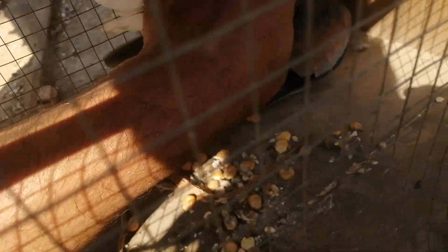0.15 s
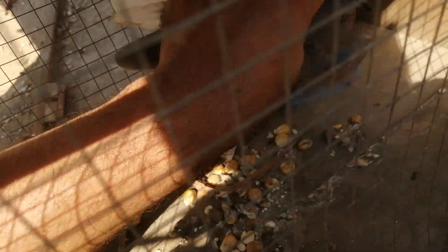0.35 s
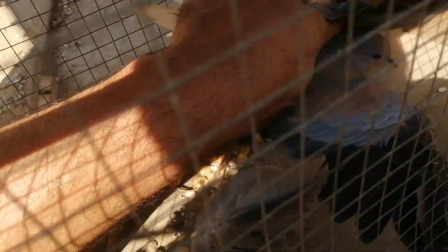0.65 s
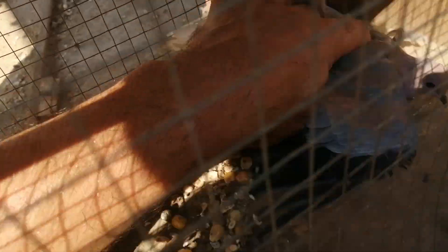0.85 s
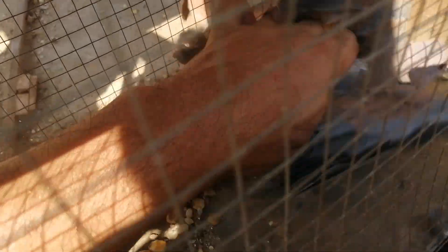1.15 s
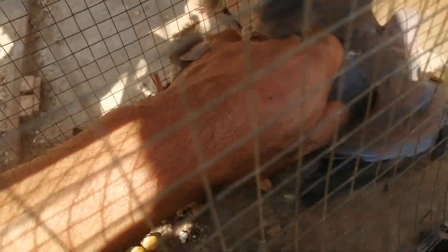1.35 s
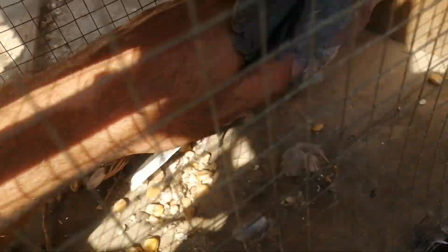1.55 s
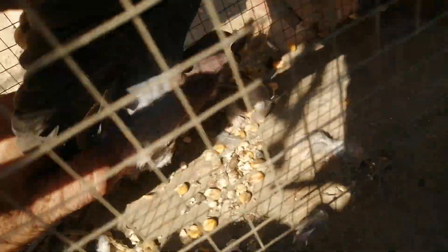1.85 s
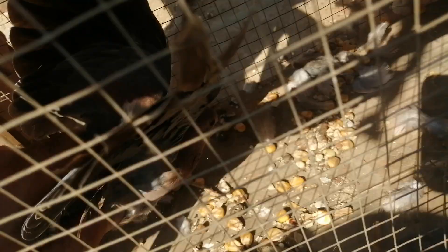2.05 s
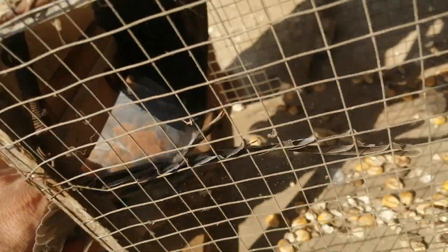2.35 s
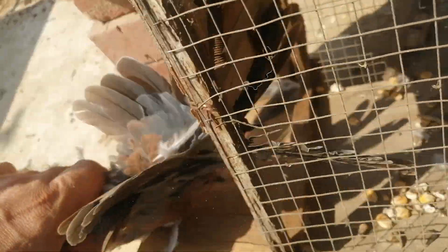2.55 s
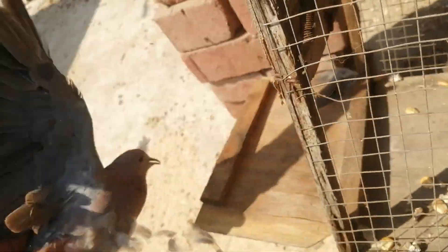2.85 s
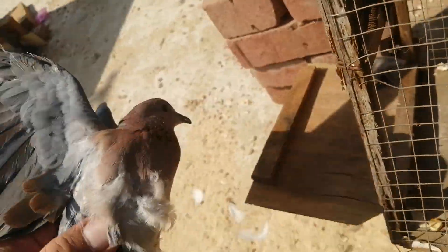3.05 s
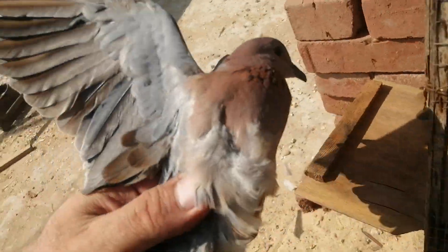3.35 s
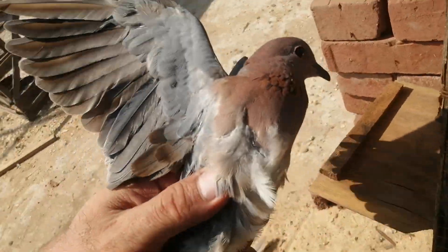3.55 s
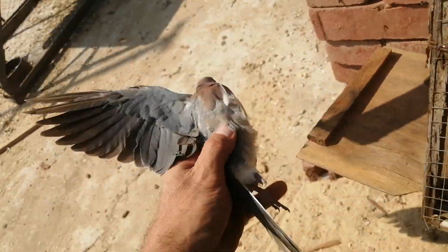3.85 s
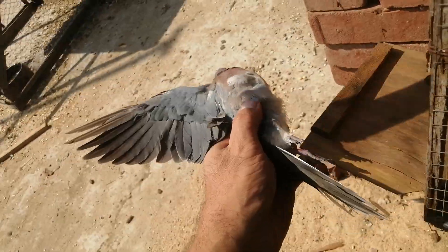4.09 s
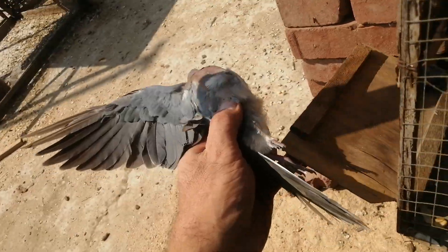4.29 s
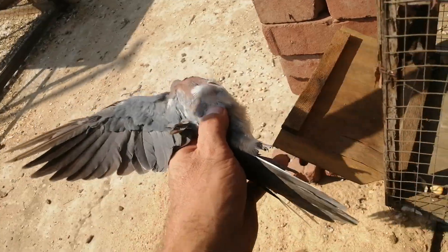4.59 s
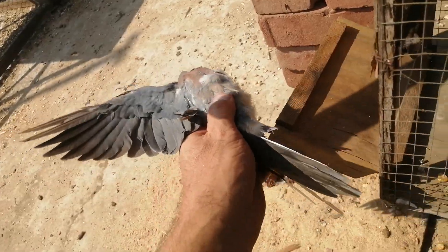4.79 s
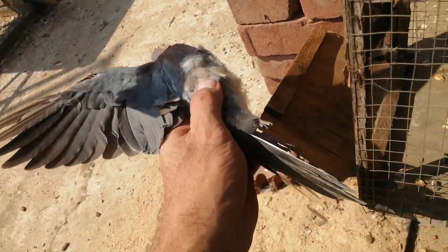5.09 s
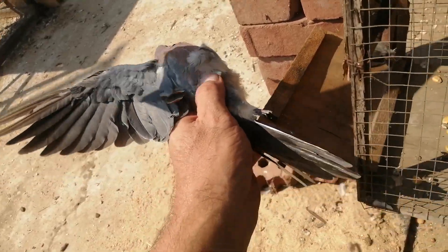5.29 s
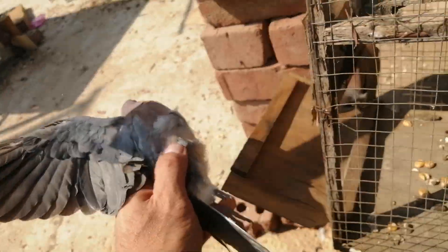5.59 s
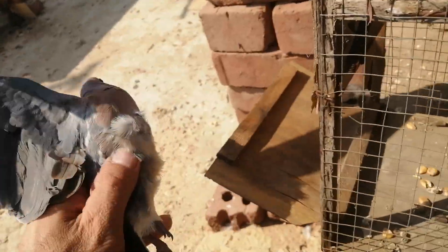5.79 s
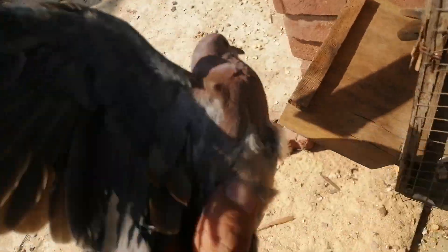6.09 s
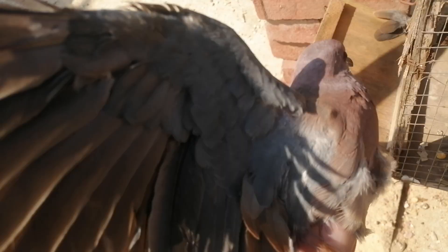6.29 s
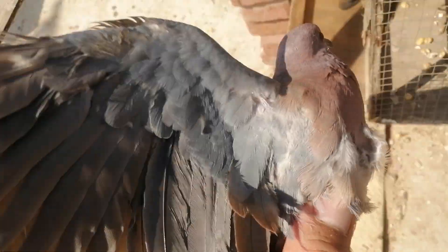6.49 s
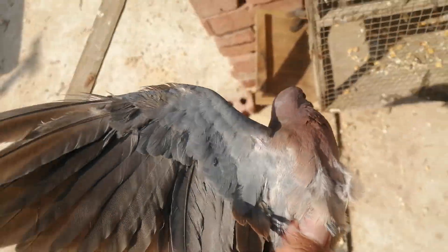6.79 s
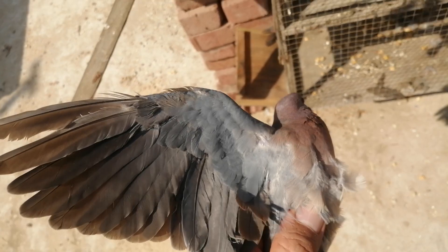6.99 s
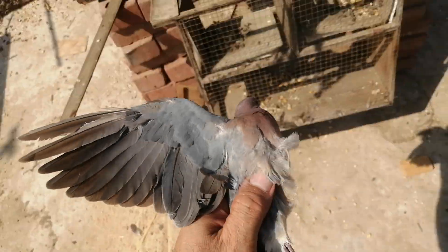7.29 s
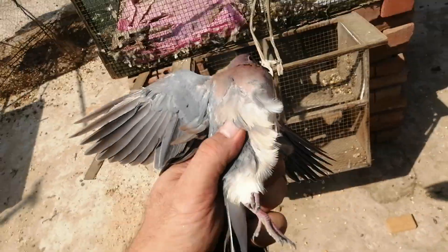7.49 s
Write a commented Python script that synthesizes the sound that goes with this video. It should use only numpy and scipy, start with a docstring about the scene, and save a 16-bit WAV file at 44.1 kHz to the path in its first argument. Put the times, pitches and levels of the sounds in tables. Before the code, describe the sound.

Close stereo sound in a quiet outdoor yard. From 0 to 0.35 seconds there is soft rustling and a light wing swish. Between about 0.36 and 1.35 a dove beats irregularly against its cage: sharp quill cracks, wooden knocks, hollow panel bumps and very short wire rings, strongest near 0.6, 0.8, 0.9 and 1.3, with bright feather hiss. From 1.4 to 1.9 it subsides into rustling and dry flicks. Around 1.9 to 2.5 the door frame hums faintly under a dragging arm. Afterwards come sparse soft feather strokes and tiny ticks. At 4.4 to 4.8 a shoe scuffs gritty concrete, ending in a sharp snap. A folding wing hisses thinly around 5.6 to 6.1, then rustling and clearer ticks increase from 6.6 to the end. Faint chirps and a distant wavering bird call appear sporadically.

```python
"""A dove caught by hand in a wire cage beats its wings on mesh and wooden frame, then is lifted out and spread.
Impacts are decaying noise bursts; frame, panels and wires ring as damped sines.
Feathers hiss by friction: grainy noise shaped by the speed of each stroke, with resonant snags and ticks.
A shoe scuffs on gritty concrete: friction noise and impacts. Other birds call faintly as gliding or wavering
sines, over the coloured noise of quiet outdoor air."""
import sys
import numpy as np
from scipy import signal
from scipy.fft import rfft, irfft
from scipy.io import wavfile

SR = 44100
rng = np.random.default_rng(int(sys.argv[2]) if len(sys.argv) > 2 else 0)


def inscribe(sig):
    """Save sig as 16-bit PCM at rate SR to the path in sys.argv[1].

    A 1-D sig is mono; a 2-D sig holds one channel per row.
    Samples are clipped to [-1, 1] before scaling.
    """
    pcm = np.round(np.clip(np.atleast_2d(sig).T, -1, 1) * 32767)
    wavfile.write(sys.argv[1], SR, pcm.astype(np.int16))


N = 336924
TIME = np.arange(N) / SR   # t/s

# Levels in the event tables are relative: the sources add their own offsets.
# wing blows on the cage: [t/s, quill crack level/dB, frame knock level/dB]
WING_BLOWS = [(0.3635, -23.5, -16), (0.451, -10, -23), (0.466, -22, -19.5), (0.609, -10, -9.5),
              (0.619, -11.5, -16), (0.633, -12.5, -14.5), (0.6494, -18, -7), (0.7856, -8.5, 0.5),
              (0.872, -11.5, -18.5), (0.8908, -7, -6), (0.9360, -12.5, -11.5), (0.9946, -18, -22),
              (1.0111, -8.5, -15.5), (1.065, -26, -17), (1.136, -14, -25), (1.166, -21, -26),
              (1.1888, -30, -23), (1.306, -10.5, -5), (1.328, -13, -15.5)]
# wingbeats sweeping along the mesh: [start t/s, length/s, vane hiss level/dB]
WINGBEATS = [(0.131, 0.068, -36), (0.353, 0.071, -44), (0.437, 0.13, -26), (0.607, 0.095, -16.5),
             (0.756, 0.065, -23.5), (0.785, 0.066, -13.5), (0.855, 0.03, -27), (0.931, 0.041, -14.5),
             (1.048, 0.059, -15), (1.163, 0.05, -17.5), (1.276, 0.12, -19)]
# dull bumps on the panels, each ringing at a pitch set by the spot: [t/s, thud level/dB, f/Hz]
BUMPS = [(0.4667, -25, 258), (0.609, -13.5, 273), (0.6489, -24, 348), (0.7869, -15, 345), (0.938, -26, 292),
         (1.064, -27.5, 311), (1.308, -29, 346), (1.439, -36, 284), (1.918, -38, 325), (2.514, -42.5, 273),
         (3.236, -43, 270)]
# clear flicks of quills and claws past wire and fingers: [t/s, crack level/dB]
TICKS = [(0.18, -26.5), (1.441, -25.5), (1.468, -25.5), (1.545, -25), (1.572, -19), (1.796, -24),
         (1.916, -23.5), (2.107, -32.5), (2.25, -31.5), (2.348, -30), (2.399, -33.5), (2.572, -27.5),
         (2.604, -28.5), (2.904, -31), (3.142, -39), (3.404, -27.5), (3.782, -28.5), (3.935, -33),
         (4.092, -34), (4.224, -36), (4.281, -28.5), (4.798, -29), (4.852, -27), (5.031, -33), (5.069, -33),
         (5.258, -35), (5.527, -32.5), (5.787, -36.5), (5.812, -39), (6.311, -31.5), (6.348, -29.5),
         (6.471, -34), (6.587, -21), (6.669, -25.5), (6.756, -28), (6.787, -29), (6.905, -28.5),
         (7.151, -31), (7.23, -32.5), (7.259, -27), (7.589, -26)]
# clear finger strokes through the plumage: [start t/s, level/dB]
STROKES = [(2.087, -42.5), (2.348, -40), (2.514, -37.5), (2.686, -36.5), (2.9, -33.5), (2.979, -37.5),
           (3.405, -38), (3.682, -41), (3.781, -37.5), (3.884, -42), (3.955, -43), (4.053, -36.5),
           (4.158, -35.5), (4.269, -34.5), (4.908, -34), (4.94, -37), (5.647, -48.5), (5.887, -42.5),
           (5.974, -42), (6.219, -42), (6.354, -33), (6.554, -35.5), (6.784, -36.5), (6.934, -36),
           (7.16, -37.5), (7.335, -40), (7.593, -34.5)]
# how busily the bird is handled, as the level of its rustle: [t/s, level/dB]
HANDLING = [(0, -37.5), (.25, -44), (.36, -31), (.9, -27.5), (1.25, -30), (1.66, -34.5), (1.9, -37.5),
            (2.03, -50.5), (2.3, -45), (2.84, -48), (4.95, -48), (5.55, -59), (5.75, -54.5), (6.2, -53.5),
            (6.72, -40.5), (7.64, -42)]
# place of the bird as it is lifted out: [t/s, left minus right level/dB, lag of the left port/s]
BIRD_SIDE = [(1.8, 2.4, .00014), (2.1, 4, -.00022)]
# shoe meeting the ground: [t/s, grit crack level/dB, knock level/dB, thud level/dB]
FOOTFALLS = [(4.3802, -18.5, -49, -38), (4.4852, -28, -18.5, -21), (4.76, -9, -12.5, -42)]
# sole dragging over grit: [t/s, level/dB]
SCUFF = [(4.38, -26.5), (4.465, -32), (4.53, -20.5), (4.58, -27), (4.68, -31), (4.75, -43), (4.78, -26.5),
         (4.82, -37)]
# one long far-off call: [t/s, f/Hz, level/dB]
FAR_CALL = [(5.8, 650, -69), (5.97, 800, -61), (6.02, 760, -69), (6.075, 750, -59), (6.12, 760, -66)]
# soft bird notes: [start t/s, length/s, f/Hz, level/dB]
BIRD_NOTES = [(3.79, 0.24, 2550, -56), (6.234, 0.084, 467, -44)]
# distant chirps: [start t/s]
CHIRP_STARTS = [2.215, 2.761, 3.024, 3.65, 5.395, 5.485, 6.18]
# resonances of the cage: [f/Hz, level/dB, time to decay by 60 dB/s]
CAGE_MODES = [(71.9, -14.5, 0.64), (690, -3.5, 0.032), (1389, -7.5, 0.051)]

# Relative spectral densities, interpolated over log f.
# hiss of feather vanes: [f/Hz, level/dB]
VANE = [(900, -28), (3200, -17), (4500, -7), (6100, -2), (7200, -6), (9000, -7), (11500, -15), (15500, -15)]
# thin hiss of the wing tips: [f/Hz, level/dB]
WING_TIP = [(3000, -21), (8000, -1), (11000, -3.5), (15500, -0.5)]
# dull rub of the body: [f/Hz, level/dB]
RUB = [(40, -3), (120, -1.5), (320, 4.5), (520, -4), (800, -4.5), (1400, -2), (2100, -1), (3200, -9),
       (6000, -18)]
# sharp crack of a hard contact: [f/Hz, level/dB]
CRACK = [(700, -39), (3200, -7), (4600, 0), (6100, 7), (8000, -1.5), (11500, -7), (15500, -8.5)]
# knock of a hard contact: [f/Hz, level/dB]
KNOCK = [(130, -13.5), (360, 0.5), (520, -5.5), (740, -1.5), (950, 0.5), (1380, 2), (2100, -1.5),
         (3200, -7.5), (6000, -41)]
# thud of a heavy contact: [f/Hz, level/dB]
THUD = [(25, -6.5), (70, 1), (125, -3.5), (240, 3), (400, -10.5), (800, -35)]
# grit under the sole: [f/Hz, level/dB]
GRIT = [(100, -9.5), (300, -2.5), (700, -1.5), (1100, -5), (1800, 4.5), (3300, -7), (5800, -4), (9000, -14),
        (15500, -23.5)]
# outdoor air: [f/Hz, level/dB]
YARD = [(25, 0), (90, 5.5), (160, -15), (270, 6), (900, -37), (1900, -4), (3700, -14), (15500, -11.5)]
# correlation of the two microphone ports: [f/Hz, left-right likeness, 0 to 1]
LIKENESS = [(60, .8), (300, .92), (700, .86), (1400, .3), (3000, 0)]
# level difference of the two ports: [f/Hz, left minus right level/dB]
SHADOW = [(300, -4), (700, -5.5), (1300, -7.5), (4400, -6.5), (6200, -9.5), (8100, 6.5), (11000, 1.5),
          (14000, -5.5)]

CUTOFF_HZ = 16100
THUD_BELOW_KNOCK_DB = 18   # a wing is light: it shakes the panels far less than it knocks
PANEL_RING_DB, PANEL_T60_S = 6.5, 0.093   # level relative to the tabulated thud
WING_RUB_DB = -26.5   # the wing rubs on the hand alike in every beat
HANDLING_UNEVEN_DB = 1.5   # rms
HOLD_HISS_MAX_DB = -33   # pressed feathers: cap on the hiss of holding, before its flutter
STROKE_FLICK_DB, STROKE_S = -7, 0.048   # flick of a vane at the start, relative to its stroke; length
FOLD_START_S, FOLD_END_S, FOLD_DB = 5.62, 6.12, -45   # the spread wing slides shut
FAINT_TICKS_PER_S, FAINT_TICK_DB = 17, 0   # level relative to the handling
FAINT_TICK_SPREAD_DB = 8   # either way
# an arm drags along the door frame, which hums hollowly
DRAG_START_S, DRAG_END_S, DRAG_DB, DRAG_HZ, DRAG_T60_S = 1.9, 2.54, -46, 325, 0.053
CHIRP_DB, CHIRP_S = -54, 0.055
CHIRP_HZ, CHIRP_FALL_HZ_PER_S = 2880, 3500   # mid-chirp pitch and its fall, before the rasp


def from_db(db):
    """Amplitude ratio of a level: twenty decibels per factor of ten."""
    return 10 ** (np.asarray(db) / 20)


def rms_one(x):
    """Normalization to unit mean power."""
    return x / np.sqrt(np.mean(x ** 2) + 1e-20)


def in_time(rows):
    """Linear interpolation of each column against the time in the first."""
    s, *columns = np.transpose(rows)
    return [np.interp(TIME, s, c) for c in columns]


def at_hz(points, hz):
    """Interpolation of a spectrum along logarithmic frequency."""
    point_hz, values = np.array(points).T
    return np.interp(np.log(hz + 1), np.log(point_hz), values)


def drift(rate):
    """Slow random modulation: linear paths between Gaussian knots, rate of them a second; rms 1."""
    knots = rng.standard_normal(int(N / SR * rate) + 2)
    return rms_one(np.interp(TIME * rate, np.arange(len(knots)), knots))


def pan(x, left_db, lag_s):
    """Stereo localization: the ports differ in level and in arrival time."""
    late = np.clip(np.round((TIME - lag_s) * SR).astype(int), 0, N - 1)
    return np.array([x[0, late] * from_db(left_db / 2), x[1] * from_db(-left_db / 2)])


def minimum_phase(y, magnitude):
    """Causal filtering: folding the cepstrum gives the minimum-phase response of a magnitude."""
    cepstrum = irfft(np.log(magnitude))
    half = cepstrum.shape[1] // 2
    cepstrum[:, 1:half] *= 2
    cepstrum[:, half + 1:] = 0
    response = irfft(np.exp(rfft(cepstrum)))
    return signal.oaconvolve(y, response, axes=1)[:, :N]


def colour(x, spectrum, size=4096):
    """Spectral shaping at unit power gain; mid and side noise give the ports their partial correlation."""
    hz = np.arange(size // 2 + 1) * SR / size
    gain = rms_one(from_db(at_hz(spectrum, hz)))
    alike = np.clip(at_hz(LIKENESS, hz), -.98, .98)
    shadow = from_db(at_hz(SHADOW, hz) * np.array([[.5], [-.5]]))
    shadow = shadow / np.sqrt(np.mean(shadow ** 2, axis=0))
    mid, side = minimum_phase(x, np.sqrt([(1 + alike) / 2, (1 - alike) / 2]))
    return minimum_phase(np.array([mid + side, mid - side]), gain * shadow)


def friction(slips_per_s=220, size_db=2.5, slip_s=0.0042, smooth=0.2):
    """Stick-slip friction: many uneven slips, each a brief burst, over a smooth share of hiss; rms 1."""
    sizes = from_db(size_db * np.minimum(rng.exponential(1, N), 4))
    slips = (rng.random(N) < slips_per_s / SR) * sizes ** 2
    power = signal.lfilter([1], [1, -np.exp(-1 / (slip_s * SR))], slips + 1e-18)
    share = np.clip(smooth, 0, 1)
    return rng.standard_normal((2, N)) * np.sqrt(share + (1 - share) * power / power.mean())


def impacts(times, levels_db, rise_s, t60, tail_db, tail_t60):
    """Impact noise: a fast-dying burst, then weaker scatter from the surfaces around."""
    age = np.arange(SR // 2) / SR
    decay = from_db(-60 * age / t60) ** 2
    scatter = from_db(tail_db - 60 * age / tail_t60) ** 2
    shape = (1 - np.exp(-age / rise_s)) ** 2 * (decay + scatter)
    power = np.zeros(N + len(age))
    for s, level_db in zip(times, levels_db):
        at = max(int(s * SR), 0)
        power[at:at + len(age)] += from_db(level_db) ** 2 * shape
    return rng.standard_normal((2, N)) * np.sqrt(power[:N])


def strikes(rows, ring_db, scatter_db, crack_t60, knock_t60):
    """Hard contact: a brief high crack and a lower knock, each with a scattered tail."""
    s, crack_db, knock_db = np.transpose(rows)[:3]
    crack = impacts(s, crack_db + 7.0, rise_s=0.00054, t60=crack_t60, tail_db=scatter_db, tail_t60=0.17)
    knock = impacts(s, knock_db + 5, rise_s=.0006, t60=knock_t60, tail_db=ring_db, tail_t60=.22)
    return colour(crack, CRACK) + colour(knock, KNOCK)


def thuds(rows, t60):
    """Heavy contact: a low burst with a short rumble after it; rows of [t/s, level/dB]."""
    s, thud_db = np.transpose(rows)
    burst = impacts(s, thud_db + 3.5, rise_s=0.00095, t60=t60, tail_db=-32, tail_t60=0.35)
    return colour(burst, THUD)


def ring(clicks, hz, t60):
    """Damped resonance: a unit click starts a decaying sine of initial height 1."""
    radius, angle = from_db(-60 / (t60 * SR)), 2 * np.pi * hz / SR
    feedback = [1, -2 * radius * np.cos(angle), radius * radius]
    return signal.lfilter([0, np.sin(angle)], feedback, clicks + 1e-18)


def stroke_speed(start, end, swell_s, fade):
    """Kinematics of a stroke: speed swells quickly, then eases off over the last share of its length."""
    span = slice(int(start * SR), int(end * SR))
    t = TIME[span]
    ramp = np.minimum((t - start) / swell_s, (end - t) / (fade * (end - start)))
    return span, np.sin(np.pi / 2 * np.clip(ramp, 0, 1))


def bounce(x, delay_s=.0017, wander=0.2976, echo_db=-8.5):
    """Early reflection: arm, floor and cage wall return one close echo whose delay wanders about delay_s."""
    echo = np.array([np.interp(TIME - delay_s * np.exp(wander * drift(5)), TIME, side) for side in x])
    gain = from_db(echo_db)
    return (x + gain * echo) / np.sqrt(1 + gain ** 2)


def yard(level_db=-54):
    """Ambient noise: steady random pressure coloured as quiet outdoor air."""
    return from_db(level_db) * colour(rng.standard_normal((2, N)), YARD)


def birds(note_waver=0.0222):
    """Frequency modulation: soft wavering notes, rasping downward chirps and one distant call."""
    out = np.zeros(N)
    wavering_time = np.cumsum(1 + note_waver * drift(200)) / SR
    flutter = from_db(3.5 * drift(70))
    for s, length, hz, level_db in BIRD_NOTES:
        swell = np.sin(np.pi * np.clip((TIME - s) / length, 0, 1))
        out += from_db(level_db) * swell * np.sin(2 * np.pi * hz * wavering_time)

    # fast drift roughens each chirp, slow drift shifts its pitch
    rasp = 1 + .04 * drift(700) + .06 * drift(10)
    age = TIME[:int(CHIRP_S * SR)]
    swell = np.sin(np.pi * age / CHIRP_S)
    for s in CHIRP_STARTS:
        span = slice(int(s * SR), int(s * SR) + len(age))
        glide_hz = (CHIRP_HZ - CHIRP_FALL_HZ_PER_S * (age - CHIRP_S / 2)) * rasp[span]
        out[span] += from_db(CHIRP_DB) * swell * np.sin(2 * np.pi * np.cumsum(glide_hz) / SR)

    pitch_hz, level_db = in_time(FAR_CALL)
    calling = (TIME > FAR_CALL[0][0]) & (TIME < FAR_CALL[-1][0])
    phase = 2 * np.pi * np.cumsum(pitch_hz * (1 + note_waver * drift(120))) / SR
    return flutter * (out + calling * from_db(level_db) * np.sin(phase))


def shoe():
    """Friction and impact: the sole touches down, drags over grit and snaps near the end, off to the right."""
    level_db, = in_time(SCUFF)
    touching = (TIME > SCUFF[0][0]) & (TIME < SCUFF[-1][0])
    drag = colour(friction() * touching * from_db(level_db), GRIT)
    steps = strikes(FOOTFALLS, ring_db=-20.5, scatter_db=-19.5, crack_t60=0.021, knock_t60=0.02)
    steps = steps + thuds([(s, thud_db) for s, _, _, thud_db in FOOTFALLS], t60=0.17)
    solid_ground = signal.butter(1, 105, "high", fs=SR, output="sos")   # concrete gives little deep bass
    steps = signal.sosfilt(solid_ground, steps)
    return pan(drag, left_db=-1.5, lag_s=0.00028) + pan(steps, left_db=-1.0, lag_s=0.00036)


def door_drag():
    """Friction-driven resonance: uneven slips keep the frame humming, fading as the arm comes out."""
    hum = rms_one(ring(friction()[0], DRAG_HZ, DRAG_T60_S))
    span, speed = stroke_speed(DRAG_START_S, DRAG_END_S, swell_s=DRAG_T60_S, fade=1)
    out = np.zeros(N)
    out[span] = from_db(DRAG_DB) * speed * hum[span]
    return out


def panel_rings():
    """Plate resonance: a bumped panel gives a short hollow note."""
    out, age = np.zeros(N), TIME[:SR // 4]
    for s, thud_db, hz in BUMPS:
        at = int(s * SR)
        decay = from_db(thud_db + PANEL_RING_DB - 60 * age / PANEL_T60_S)
        out[at:at + len(age)] += decay * np.sin(2 * np.pi * hz * age)
    return out


def wires(count=14, low_hz=650, high_hz=10000, level_db=-34.5, t60=0.032):
    """Plucked spans: each blow sets some of the mesh ringing briefly, each span at its own pitch."""
    out, age = np.zeros((2, N)), TIME[:SR // 4]
    for s, crack_db, knock_db in WING_BLOWS:
        place = rng.random((count, 1))   # short spans ring high and answer the crack, long ones the knock
        hz = low_hz * (high_hz / low_hz) ** place
        heights = from_db(level_db + knock_db + place * (crack_db - knock_db))
        rings = heights * from_db(-60 * age / t60) * np.sin(2 * np.pi * hz * age)
        at = int(s * SR)
        out[:, at:at + len(age)] += rng.standard_normal((2, count)) @ rings
    return out


def panel_shoves():
    """Momentum transfer: bumps shake the panels, wing blows lightly; rows of [t/s, level/dB]."""
    bumps = [(s, thud_db) for s, thud_db, _ in BUMPS]
    return bumps + [(s, knock_db - THUD_BELOW_KNOCK_DB) for s, _, knock_db in WING_BLOWS]


def cage():
    """Modal excitation: shoves boom the lowest mode, knocks ring the upper ones; strikes and thuds sound too."""
    shoves = panel_shoves()
    knocks = [(s, knock_db) for s, _, knock_db in WING_BLOWS]
    modes = np.zeros(N)
    for k, (hz, level_db, t60) in enumerate(CAGE_MODES):
        s, force_db = np.transpose(shoves if hz < 500 else knocks)
        clicks = np.bincount((s * SR).astype(int), from_db(force_db + level_db), N)
        modes += (-1) ** k * ring(clicks, hz, t60)   # neighbouring modes have opposite sign
    contact = strikes(WING_BLOWS, ring_db=-15.5, scatter_db=-22, crack_t60=0.034, knock_t60=0.033)
    return modes + contact + thuds(shoves, t60=0.085)


def ticks(stroke_knock_db=-12, hard_flick_db=-24, softening=0.68):
    """Light impact: quills and claws flick drily, lighter flicks knock less; faint ones come by chance."""
    count = int(FAINT_TICKS_PER_S * N / SR)
    s = rng.random(count) * TIME[-1]
    spread_db = FAINT_TICK_SPREAD_DB * rng.uniform(-1, 1, count)
    faint_db = np.interp(s, *np.transpose(HANDLING)) + FAINT_TICK_DB + spread_db
    flicks = list(TICKS) + list(zip(s, faint_db))
    quills = [(at, db, db + softening * min(db - hard_flick_db, 0)) for at, db in flicks]
    vanes = [(at, db + STROKE_FLICK_DB, db + stroke_knock_db) for at, db in STROKES]
    return bounce(strikes(quills + vanes, ring_db=-33, scatter_db=-24, crack_t60=0.014, knock_t60=0.022))


def snags(per_s=260, count=40, low_hz=1200, high_hz=10000, cycles=18):
    """Catch and release: single barbs and shafts tick, each at one of count pitches; rms 1."""
    sizes = rng.standard_normal(N) * (rng.random(N) < per_s / SR)
    dealt = rng.integers(0, count, N)
    out = np.zeros((2, N))
    for k, hz in enumerate(np.geomspace(low_hz, high_hz, count)):
        angle = 2 * np.pi * rng.random()   # each pitch reaches the two ports in its own proportion
        tick = hz * ring(sizes * (dealt == k), hz, cycles / hz)
        out += np.outer([np.cos(angle), np.sin(angle)], tick)
    return rms_one(out)


def feathers(handling_rub_db=-1.0, stroke_rub_db=-4.0, snag_db=-10.0, wing_tip_db=-2.0):
    """Sliding friction: barbs hiss and snag, the body rubs duller, sliding vanes add a brighter hiss."""
    # powers of each kind of contact over time
    handling_db = in_time(HANDLING)[0] + HANDLING_UNEVEN_DB * drift(20)
    holding = from_db(np.minimum(handling_db, HOLD_HISS_MAX_DB) + 3.53 * drift(110)) ** 2
    rub = from_db(handling_db + handling_rub_db + 1.57 * drift(55)) ** 2
    sliding, folding = np.zeros((2, N))
    for start, length, vane_db in WINGBEATS:
        span, speed = stroke_speed(start, start + length, swell_s=0.0088, fade=0.66)
        sliding[span] += (speed * from_db(vane_db)) ** 2
        rub[span] += (speed * from_db(WING_RUB_DB)) ** 2
    for start, level_db in STROKES:
        span, speed = stroke_speed(start, start + STROKE_S, swell_s=0.0053, fade=0.8)
        sliding[span] += (speed * from_db(level_db)) ** 2
        rub[span] += (speed * from_db(level_db + stroke_rub_db)) ** 2
    span, speed = stroke_speed(FOLD_START_S, FOLD_END_S, swell_s=0.08, fade=0.3)
    folding[span] = (speed * from_db(FOLD_DB)) ** 2

    barbs, tips = (friction(slips_per_s=450, size_db=3.2, slip_s=.0008, smooth=.42) for _ in range(2))
    hiss = np.sqrt(holding + sliding)
    pull = np.minimum(hiss, from_db(-25.0))   # a single barb holds only so much before it lets go
    vanes = colour(barbs * hiss, VANE) + from_db(snag_db) * pull * snags()
    edges = from_db(wing_tip_db) * colour(tips * np.sqrt(sliding + folding), WING_TIP)
    body = colour(friction() * np.sqrt(rub), RUB)
    return bounce(vanes + edges + body)


def scene():
    """Superposition: the yard and its birds, the shoe, and the dove with its cage."""
    dove = door_drag() + panel_rings() + wires() + cage() + ticks() + feathers()
    return yard() + birds() + shoe() + pan(dove, *in_time(BIRD_SIDE))


def record(dry):
    """Saturation and band limiting: high peaks overload the microphone softly; the top is cut."""
    rounded = dry / (1 + np.abs(dry) ** 4) ** (1 / 4)
    low_pass = signal.ellip(12, .1, 80, CUTOFF_HZ, fs=SR, output="sos")
    return signal.sosfilt(low_pass, rounded)


dry = scene()
out = record(dry)
inscribe(out)
```